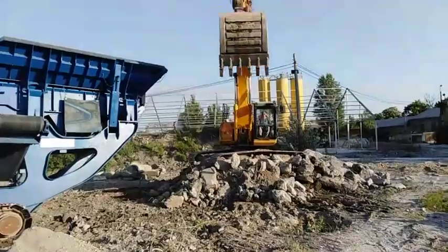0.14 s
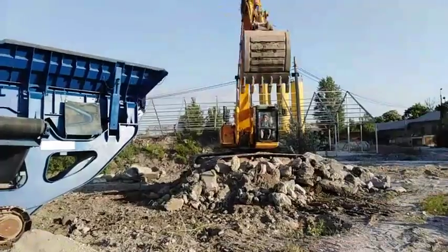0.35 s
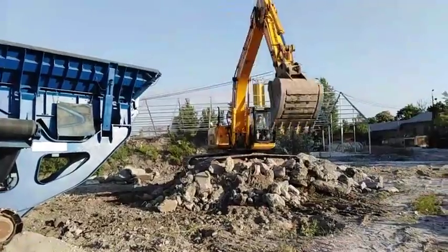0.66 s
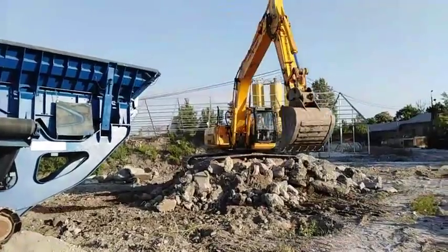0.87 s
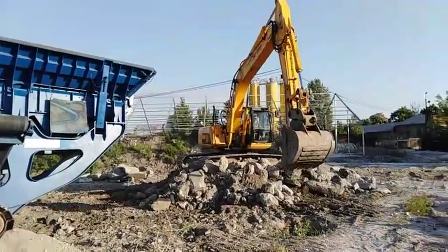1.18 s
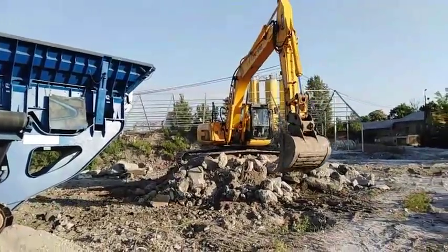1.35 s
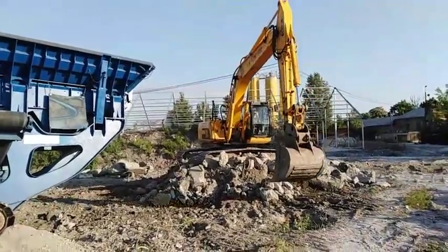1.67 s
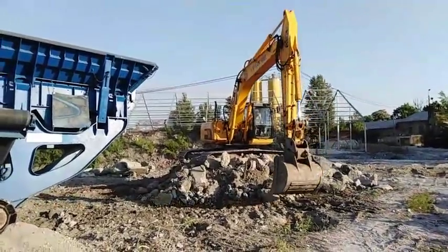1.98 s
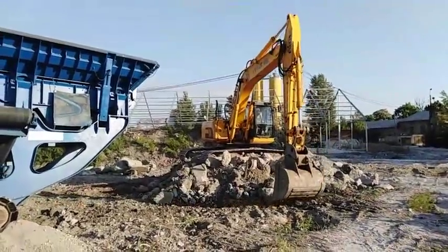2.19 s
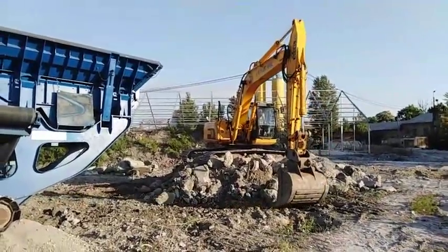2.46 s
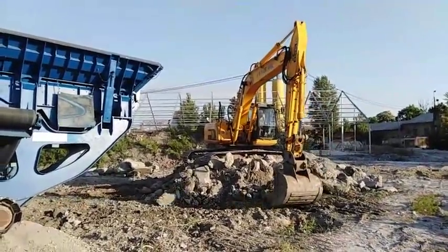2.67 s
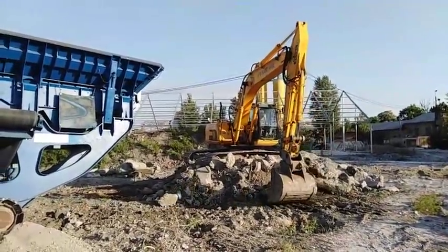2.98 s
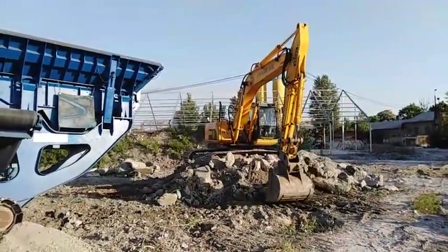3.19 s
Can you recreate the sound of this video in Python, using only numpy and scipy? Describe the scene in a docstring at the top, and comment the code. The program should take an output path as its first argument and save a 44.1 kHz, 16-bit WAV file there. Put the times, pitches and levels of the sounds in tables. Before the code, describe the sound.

Continuous heavy diesel roar with stone rattle and pump whine on an open rubble site, in stereo; short squeaks, then a faint high valve whistle, then a cluster of gritty, ringing bucket knocks near the end.

```python
"""Crusher and excavator on a rubble heap

Both machines roar side by side as the sound fades in: shaped noise with diesel firing tones and pump whines.
A roller squeaks in short rubbing tones, then a hydraulic valve whistles: a wavering tone with a fuzzy skirt.
Near the end the steel bucket knocks and scrapes into concrete lumps: bursts of grit that ring steel modes.
Two microphone ports, left and right, hear it with their own levels and delays."""
import sys
import numpy as np
from scipy import signal
from scipy.fft import rfft, irfft
from scipy.io import wavfile
from scipy.ndimage import uniform_filter1d

SR = 44100
rng = np.random.default_rng(int(sys.argv[2]) if len(sys.argv) > 2 else 0)


def bounce(signal):
    """Save signal as a 16-bit WAV file at the path given by the first command-line argument."""
    frames = np.transpose(np.atleast_2d(signal))
    limited = np.clip(frames, -1, 1)
    pcm = np.round(limited * 32767).astype(np.int16)
    wavfile.write(sys.argv[1], SR, pcm)


N = 147294  # length in samples


def gain_of(db):
    """Turns decibels into an amplitude factor."""
    return 10 ** (np.asarray(db) / 20)


def evened(x):
    """Scales a signal to an RMS of one."""
    return x / np.sqrt(np.mean(x ** 2) + 1e-20)


def add(mix, s, sound):
    """Mixes a sound in at s seconds, cut off at the end of the mix."""
    part = mix[..., round(s * SR):][..., :sound.shape[-1]]
    part += sound[..., :part.shape[-1]]


def ports(x, pan_db):
    """Places a sound between the two ports; pan_db is left minus right."""
    return x * gain_of([[pan_db / 2], [-pan_db / 2]])


def hum(hz, width):
    """Wavering tone: noise narrowed by two equal poles of this width in Hz, moved up to the curve hz."""
    r = np.exp(-np.pi * width / SR)
    z = rng.standard_normal(N + SR) + 1j * rng.standard_normal(N + SR)
    z = signal.lfilter([1], [1, -2 * r, r * r], z)[SR:]  # the first second lets the filter settle
    carrier = np.exp(2j * np.pi * np.cumsum(hz * np.ones(N)) / SR)
    return evened((z * carrier).real)


def roar():
    """Both machines as random short-time spectra, whose rumble and stone rattle swell on their own."""
    # Colour of the roar. Each row: frequency in Hz, relative level at the right port in dB per Hz,
    # left minus right in dB.
    spectrum = [(55, -41.5, -1.5), (83.5, -37.5, 1.5), (195, -40, -1.5), (281, -43, 3), (417, -46.5, -1),
                (679, -45, 1), (810, -51.5, 4), (1080, -51.5, 3.5), (2180, -59, 1.5), (2510, -60, -9.5),
                (3870, -63, 3), (4510, -64, 4), (6250, -68, -7), (6770, -67.5, 2), (8150, -69, -5.5),
                (9570, -67, -2), (11200, -71, -9.5), (13500, -73.5, -6)]
    # Delay between the ports. Each row: frequency in Hz, phase lead of the left port in radians (minus: lag).
    port_lead = [(0, 0), (430, -.9), (800, -1.4), (1460, -3.2), (7150, -31), (14500, -50)]
    # Load on the machines; only departures from each column's mean count.
    # Each row: time in seconds, level of the rumble in dB, level of the treble rattle in dB.
    load = [(.3, -14.5, -33.5), (.45, -14, -30.5), (.62, -13, -32.5), (.78, -12.5, -31.5), (.95, -9, -33),
            (1.5, -12.5, -31.5), (1.7, -9.5, -31), (1.77, -10.5, -34), (2, -11.5, -31.5), (2.15, -12, -31),
            (2.5, -13, -31.5), (3, -11, -32.5), (3.34, -11, -30.5)]
    level_db = -12.5
    rattle_from_hz, rattle_full_hz = 170, 2350
    patch_db, flicker_db, surge_db = 1.5, 1.0, 3
    alike_hz, alike_floor = 1730, 0.14  # the ports agree in the bass and drift apart above

    frames, hz = N // 256 + 5, np.fft.rfftfreq(1024, 1 / SR)
    t = np.arange(frames) * 256 / SR
    a, b, c, d, patches, surges = rng.standard_normal((frames, 513, 6)).T  # each: frequency by time
    for _ in range(2):
        surges = uniform_filter1d(surges, size=24, axis=1)
    surges = evened(surges)
    patches = uniform_filter1d(patches, size=14, axis=0)
    patches = evened(uniform_filter1d(patches, size=10, axis=1))
    flicker = evened(uniform_filter1d(rng.standard_normal(frames), size=3))

    f, *columns = np.transpose(spectrum)
    level, pan = [np.interp(np.log(hz + 1), np.log(f), v)[:, None] for v in columns]
    like = (alike_floor + (1 - alike_floor) / (1 + (hz / alike_hz) ** 2))[:, None]
    right = a + 1j * b
    left = like * right + np.sqrt(1 - like ** 2) * (c + 1j * d)
    lead = np.exp(1j * np.interp(hz, *np.transpose(port_lead)))[:, None]
    z = np.array([gain_of(pan) * lead * left, right])

    s, low, high = np.transpose(load)
    octaves_share = np.log((hz + 1) / rattle_from_hz) / np.log(rattle_full_hz / rattle_from_hz)
    rattle = np.clip(octaves_share, 0, 1)[:, None]
    rumble = 1 - rattle
    rumble_swell = np.interp(t, s, low - low.mean()) + surge_db * surges
    rattle_swell = np.interp(t, s, high - high.mean()) + flicker_db * flicker + patch_db * patches
    z *= gain_of(level + rumble * rumble_swell + rattle * rattle_swell)
    return gain_of(level_db) * evened(signal.istft(z, nperseg=1024, noverlap=768)[1][:, :N])


def engines():
    """Diesel firing tone under load, wavering side tones, and pump whines that reach the right port first."""
    # Load on the main firing tone. Each row: time in seconds, level in dB.
    firing_level = [(.3, -29), (.9, -16), (1.3, -36), (1.55, -19.5), (1.9, -14.5), (2.5, -21.5), (2.9, -30),
                    (3.34, -19)]
    # Engine side tones. Each row: frequency in Hz, wobble width in Hz, level in dB.
    side_tones = [(107.6, 19.7, -24), (133.6, 4.7, -27.5), (159.4, 3.6, -33.5), (196.5, 12, -27.5),
                  (314.3, 63, -28)]
    # Pump whines. Each row: frequency in Hz, wobble width in Hz, relative level in dB.
    whines = [(700, 50, -33), (916, 18, -34), (938, 25, -38), (982, 22, -34), (965, 110, -32)]
    # Swell of all the whines. Each row: time in seconds, gain in dB.
    whine_level = [(.3, 4), (2.2, 0), (2.7, 1.5), (3.34, -6.5)]
    firing_hz, firing_wobble_hz = 79.74, 13.4
    whine_pan_db, whine_lag_s = -3, 0.00015

    t = np.arange(N) / SR
    firing = np.sin(2 * np.pi * firing_hz * t) + .5 * hum(firing_hz, firing_wobble_hz)
    firing *= gain_of(np.interp(t, *np.transpose(firing_level)))
    low = firing + sum(gain_of(db) * hum(hz, width) for hz, width, db in side_tones)

    whine = sum(gain_of(db) * hum(hz, width) for hz, width, db in whines)
    whine *= gain_of(np.interp(t, *np.transpose(whine_level)))
    left, right = ports(whine, whine_pan_db)
    return low + np.array([np.roll(left, round(whine_lag_s * SR)), right])


def squeaks():
    """Short rubbing roller tones that sag from a sharp start; the octave sounds in the first part only."""
    # Roller squeaks. Each row: start in seconds, length in seconds, settled pitch in Hz, level in dB,
    # octave against the fundamental in dB.
    rubs = [(.735, .016, 3750, -31.5, -14), (.765, .026, 3490, -27, -6), (1.012, .036, 3490, -26, -5),
            (1.235, .018, 4500, -33, -14), (2.535, .02, 3460, -34, -2), (2.592, .022, 3460, -34, 7),
            (2.79, .03, 3470, -27, -1), (2.846, .045, 3520, -25.5, -6), (3.232, .026, 3500, -28, 3),
            (3.268, .014, 3650, -27, -14), (3.298, .035, 3490, -27, -3)]
    pan_db, octave_share, roughness = -8, .55, .4
    sag = .035  # share of pitch lost just after the start

    out = np.zeros(N)
    for s, length, hz, db, octave_db in rubs:
        u = np.arange(round(length * SR)) / (length * SR)
        waver = 1 + .06 * uniform_filter1d(rng.standard_normal(4000), size=150)[:len(u)]
        rough = evened(uniform_filter1d(rng.standard_normal(4000), size=120))[:len(u)]
        grip = 1 + roughness * rough
        turn = 2 * np.pi * np.cumsum(hz * waver * (1 + sag * (1 - u) ** 8)) / SR
        tone = np.sin(np.pi * u) ** 0.3 * np.sin(turn)
        octave_swell = np.sin(np.pi * np.minimum(u / octave_share, 1))
        octave = gain_of(octave_db) * octave_swell * np.sin(2 * turn)
        add(out, s, gain_of(db) * grip * (tone + octave))
    return ports(out, pan_db)


def whistle():
    """A thin tone with a fuzzy skirt that swells in as the valve opens and flutters when weak."""
    # Valve whistle. Each row: time in seconds, pitch in Hz, level in dB.
    glide = [(1.5, 9240, -50), (1.84, 9250, -41), (1.94, 9260, -43), (1.955, 9255, -30), (2.08, 9275, -30),
             (2.14, 9300, -35), (2.35, 9352, -36), (2.6, 9368, -38), (3.15, 9290, -39), (3.18, 9275, -31.5),
             (3.34, 9260, -34)]
    width_hz, jitter_hz, fuzz, pan_db = 70, 11, .25, -5
    flutter_share = .3  # dB of flutter for each dB under the loudest moment, counted up to 10 dB

    t = np.arange(N) / SR
    s, hz, db = np.transpose(glide)
    jitter = evened(uniform_filter1d(rng.standard_normal(N), size=900))
    pitch = np.interp(t, s, hz) + jitter_hz * jitter
    pure = np.sqrt(2) * np.sin(2 * np.pi * np.cumsum(pitch) / SR)
    tone = (1 - fuzz) * pure + fuzz * hum(pitch, width_hz)
    level = np.interp(t, s, db, left=-90)
    unsteady = evened(uniform_filter1d(rng.standard_normal(N), size=500))
    flutter = flutter_share * np.minimum(db.max() - level, 10) * unsteady
    return ports(gain_of(level + flutter) * evened(tone), pan_db)


def coloured(x, tilt_db):
    """Gives noise the colour of steel on concrete, tilted by tilt_db per octave."""
    # Colour of steel on concrete. Each row: frequency in Hz, relative level in dB.
    steel_colour = [(300, -28), (900, -2), (2000, 0), (5000, -10.5), (8000, -23), (14000, -34)]
    hz = np.fft.rfftfreq(x.shape[-1], 1 / SR) + 1
    f, db = np.transpose(steel_colour)
    tilt = tilt_db * np.log2(hz / f[2])  # turns about the third row
    gain = gain_of(np.interp(np.log(hz), np.log(f), db) + tilt)
    return evened(irfft(rfft(x) * gain, x.shape[-1]))


def grit(count):
    """Dense stone grains of uneven size, each lump ringing briefly; partly shared by both ports."""
    grains_per_s, size_db = 900, 2.5
    stone_t60_s, stone_db = 0.021, -6.5
    like = .8  # likeness of the ports

    size = (rng.random(count) < grains_per_s / SR) * gain_of(size_db * rng.exponential(1, count))
    t = np.arange(2048) / SR
    hz = np.geomspace(800, 9000, num=24) * rng.uniform(.85, 0.9, 24)
    modes = np.sqrt(hz)[:, None] * np.sin(2 * np.pi * hz[:, None] * t)
    lump = gain_of(-60 * t / stone_t60_s) * modes.sum(0)
    dust, chips = rng.standard_normal((2, 2, count))
    stones = evened(signal.fftconvolve(chips * size, lump[None], axes=1)[:, :count])
    a, b = dust + gain_of(stone_db) * stones
    return np.array([like * a + np.sqrt(1 - like ** 2) * b, a])


def bucket():
    """Each knock is a burst of grit that rings the steel modes near its pitch; a scrape runs between them."""
    # Bucket knocks. Each row: start in seconds, level in dB, treble tilt in dB per octave,
    # time to fall 60 dB in seconds, pitch of the ring in Hz.
    knocks = [(2.606, -11, 3.5, 0.36, 2450), (2.70, -15, -5, 0.27, 1410), (2.812, -11.5, 2.5, 0.15, 2680),
              (2.862, -12.5, -1.5, 0.35, 1600), (2.9, -9, 2, 0.19, 2030), (2.956, -8.5, 4, 0.31, 2180),
              (3.02, -8, -8.5, 0.65, 570), (3.033, -16.5, 2.5, 0.09, 2330), (3.09, -14, 0.5, 0.18, 2450),
              (3.232, -9.5, 1, 0.15, 2360), (3.262, -11.5, -8.5, 0.6, 690)]
    # Ringing modes of the steel. Each row: frequency in Hz, relative strength in dB.
    steel_modes = [(570, 0), (1150, -2), (1455, 0), (1795, 0), (2035, 0), (2620, 0), (3280, -2)]
    # Scrape. Each row: time in seconds, level in dB.
    scrape = [(2.75, -29), (2.95, -22), (3.34, -30)]
    rise_s, ring_db, ring_t60_s = 0.009, -4, .035
    focus_db = -14  # per octave away from the pitch of the knock
    treble_hz, treble_t60_share = 2800, 0.65  # the treble of a knock dies first

    t, out = np.arange(16384) / SR, np.zeros((2, N))
    modes, strength = np.transpose(steel_modes)
    split = signal.butter(2, treble_hz, fs=SR, output="sos")
    for s, db, tilt_db, t60, hz in knocks:
        near = gain_of(strength + focus_db * abs(np.log2(modes / hz)))
        ring = gain_of(-60 * t / ring_t60_s) * (near @ np.sin(2 * np.pi * modes[:, None] * t))
        raw = grit(count=16384)
        rise = np.minimum(t / rise_s, 1)
        fall = gain_of(-60 * t / max(t60, .03))
        quick = fall ** (1 / treble_t60_share)
        burst = coloured(raw, tilt_db)
        low = signal.sosfiltfilt(split, burst)
        rung = evened(signal.fftconvolve(raw, ring[None], axes=1)[:, :len(t)])
        blow = rise * (fall * (low + gain_of(ring_db) * rung) + quick * (burst - low))
        # tie the energy of the blow to its envelope
        blow *= np.sqrt(2) * np.linalg.norm(rise * fall) / np.linalg.norm(blow)
        add(out, s, gain_of(db) * blow)

    s, db = np.transpose(scrape)
    scrape_level = np.interp(np.arange(N) / SR, s, db, left=-90)
    return out + gain_of(scrape_level) * coloured(grit(count=N), 0)


def scene():
    """All the sounds together at the two ports."""
    return roar() + engines() + squeaks() + whistle() + bucket()


def record(dry):
    """Low cut, soft overload, fade in from silence, band limit."""
    low_cut_hz, ceiling, edge_hz = 56.2, 0.79, 14250
    open_s = .0785  # silent before this
    fade_start_s, fade_s, fade_curve = 0.072, 0.27, 0.87

    t = np.arange(N) / SR
    cut = signal.sosfilt(signal.cheby2(10, 16, low_cut_hz, "high", fs=SR, output="sos"), dry)
    fade = (t > open_s) * np.clip((t - fade_start_s) / fade_s, 0, 1) ** fade_curve
    soft = fade * ceiling * np.tanh(cut / ceiling)
    band_limit = signal.firwin(1023, edge_hz, window=("kaiser", 10), fs=SR)
    return signal.oaconvolve(soft, band_limit[None], "same")


dry = scene()
out = record(dry)
bounce(out)
```